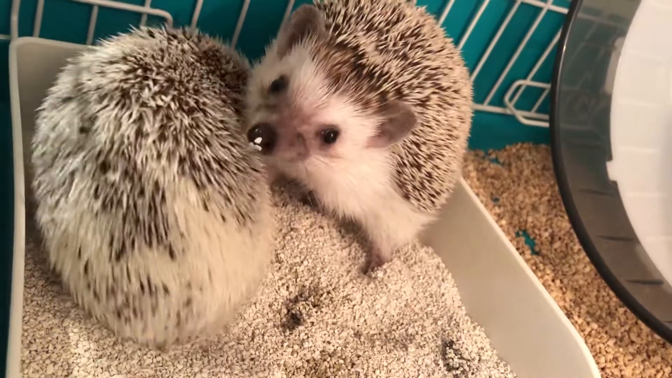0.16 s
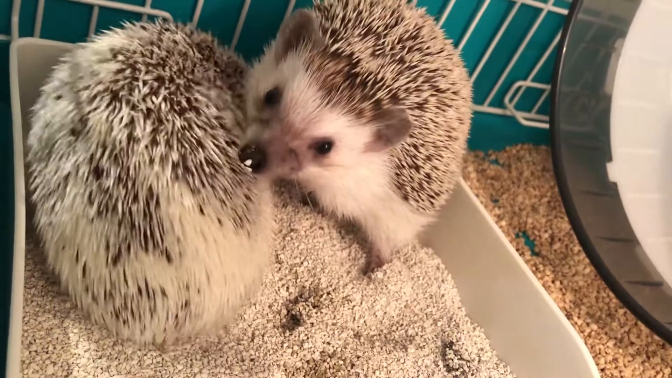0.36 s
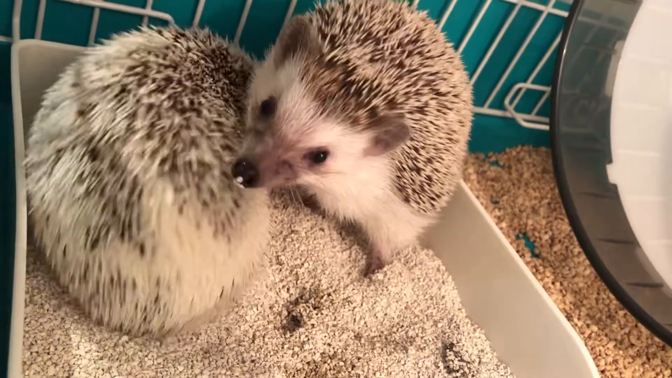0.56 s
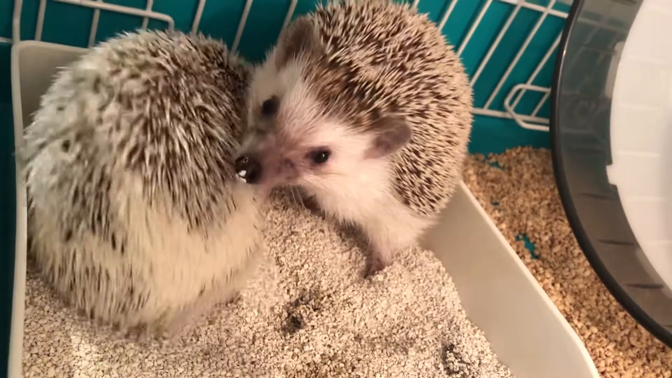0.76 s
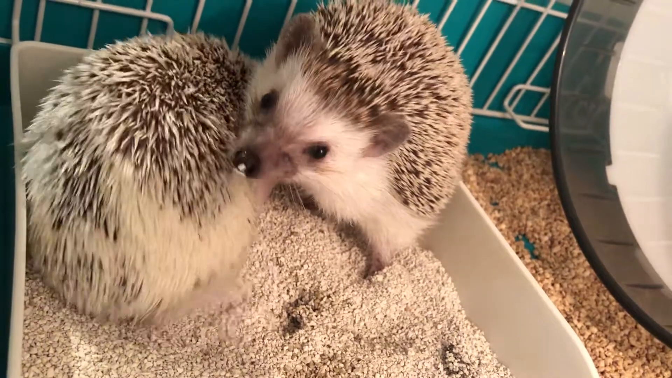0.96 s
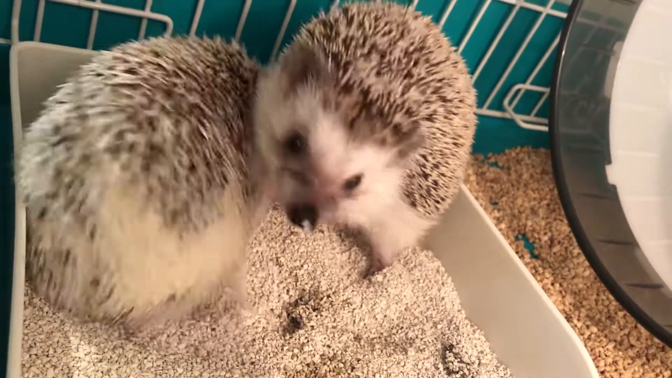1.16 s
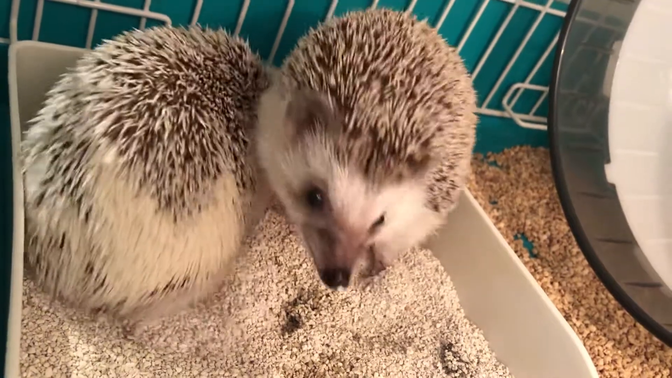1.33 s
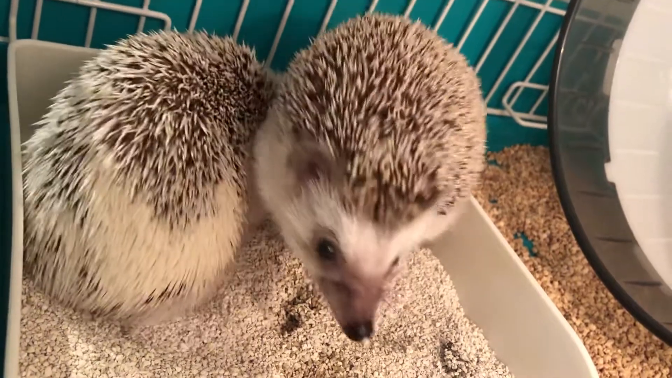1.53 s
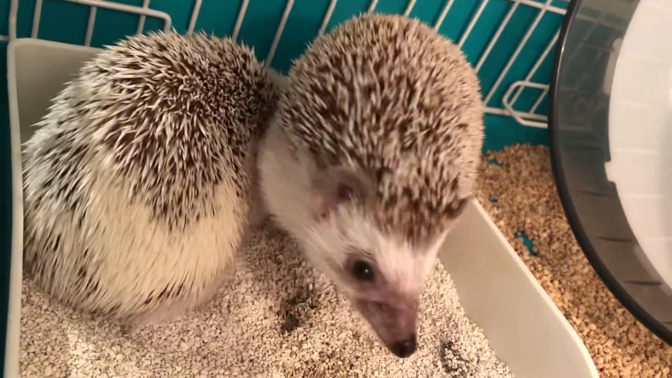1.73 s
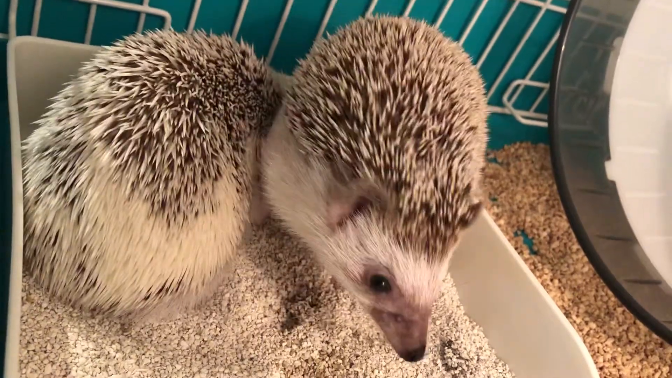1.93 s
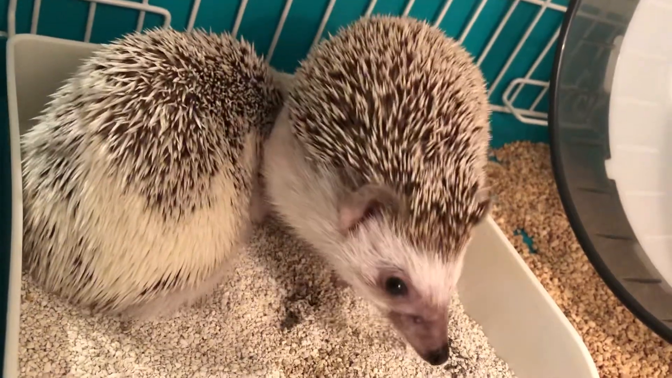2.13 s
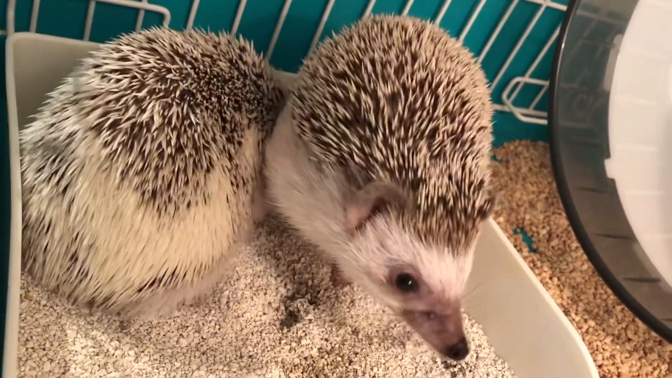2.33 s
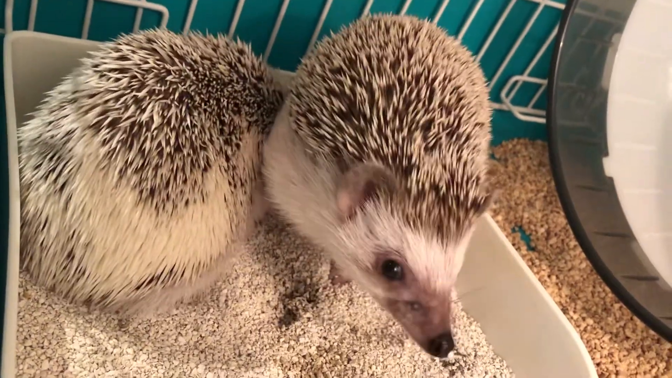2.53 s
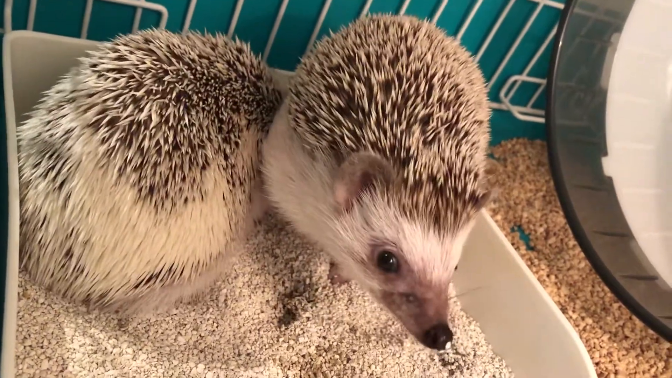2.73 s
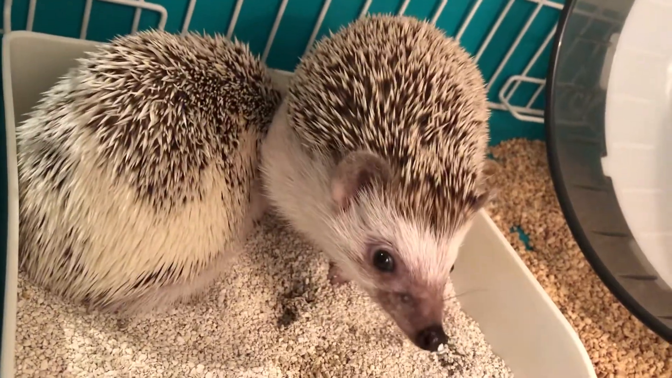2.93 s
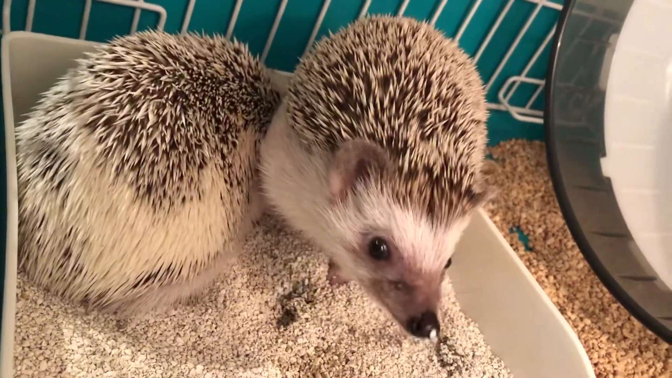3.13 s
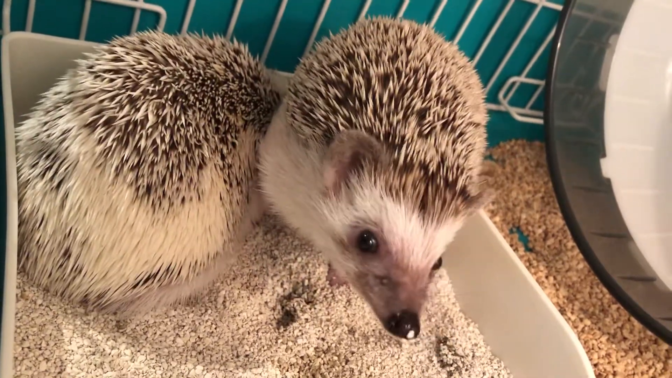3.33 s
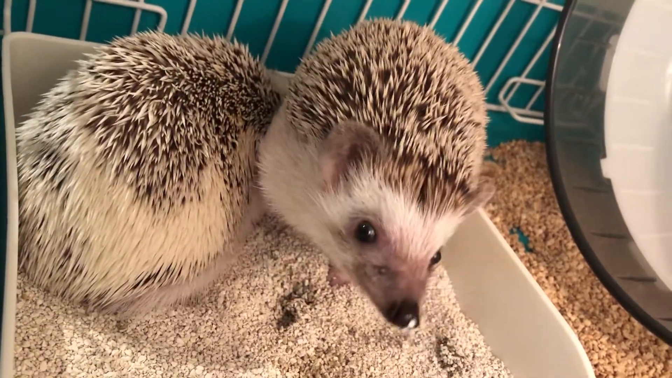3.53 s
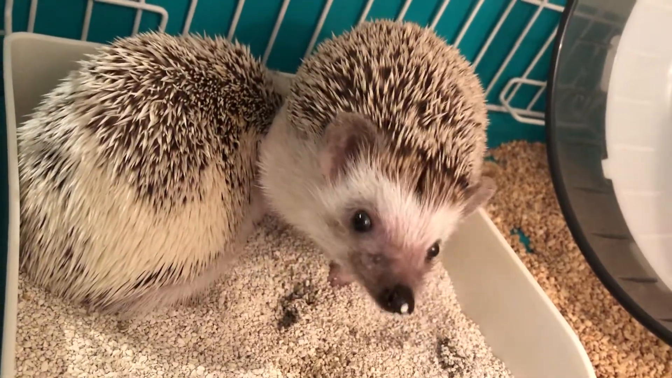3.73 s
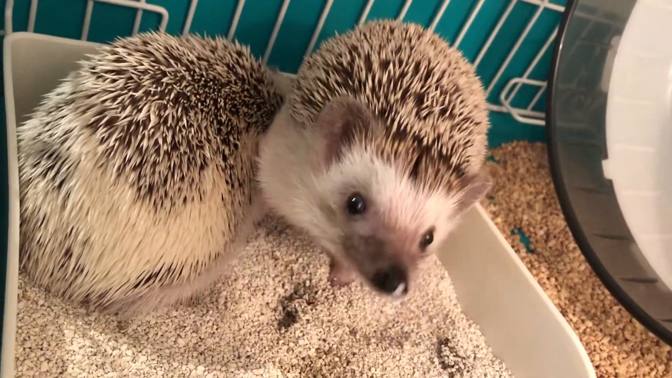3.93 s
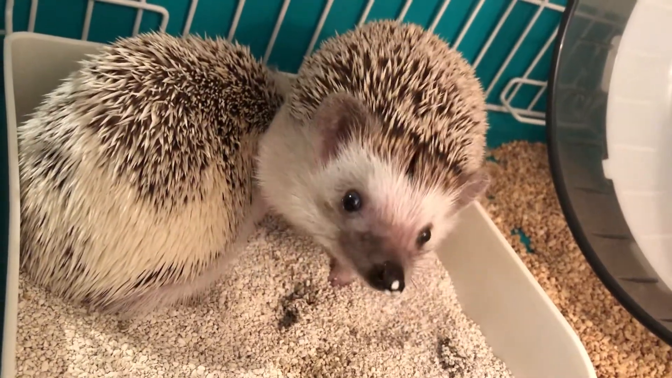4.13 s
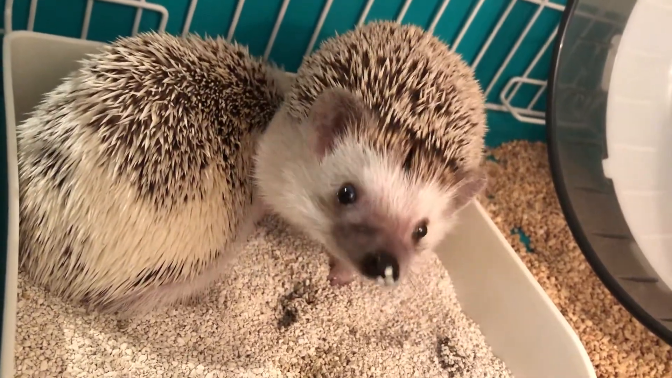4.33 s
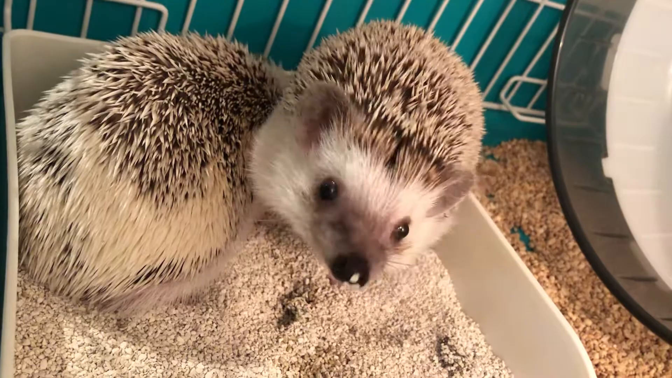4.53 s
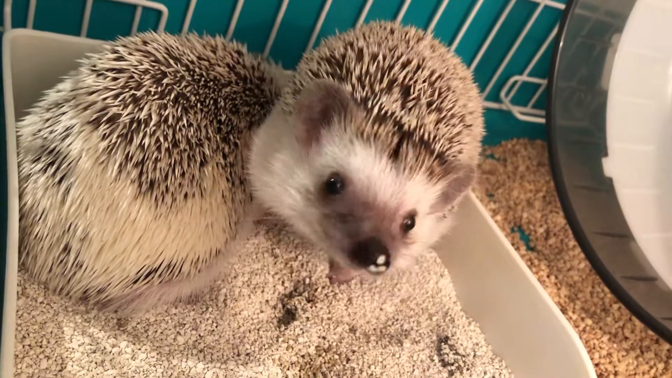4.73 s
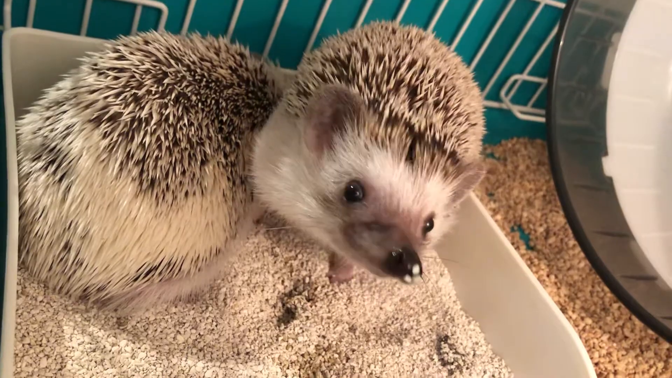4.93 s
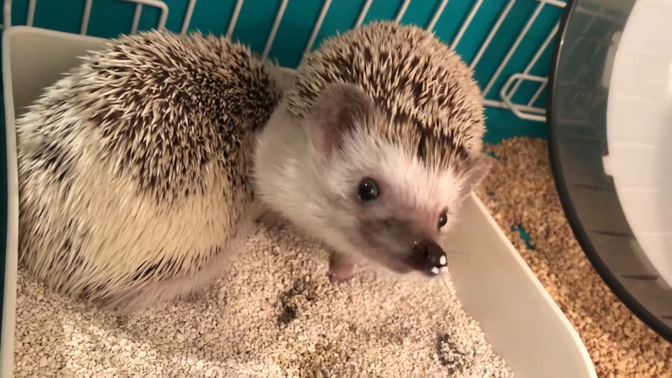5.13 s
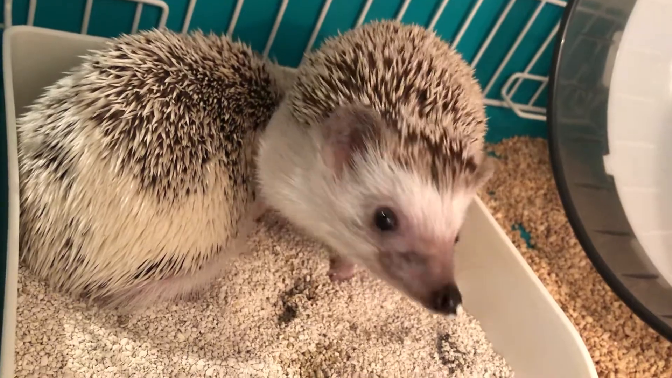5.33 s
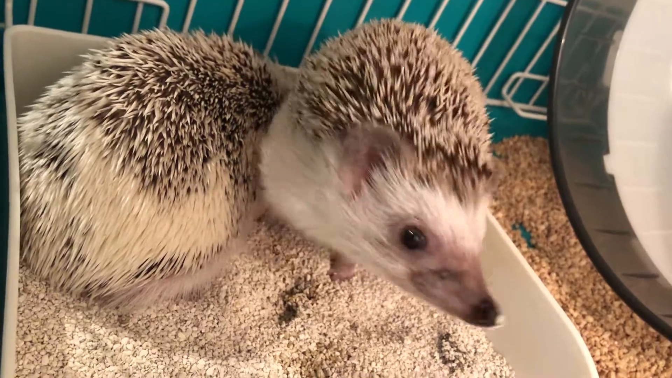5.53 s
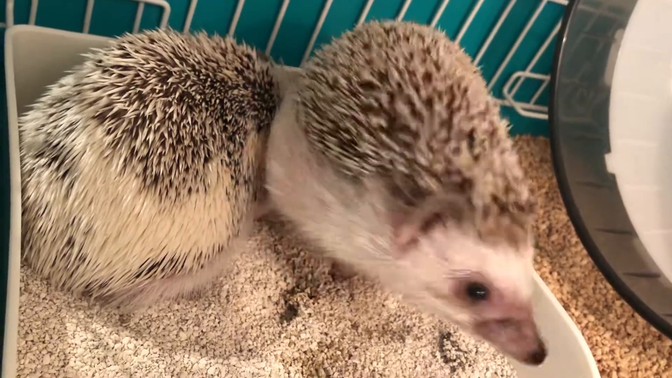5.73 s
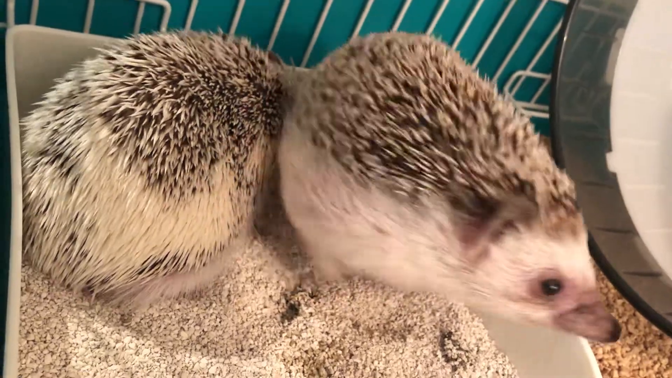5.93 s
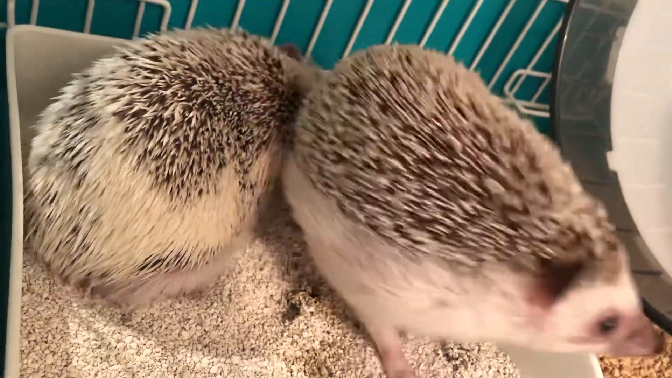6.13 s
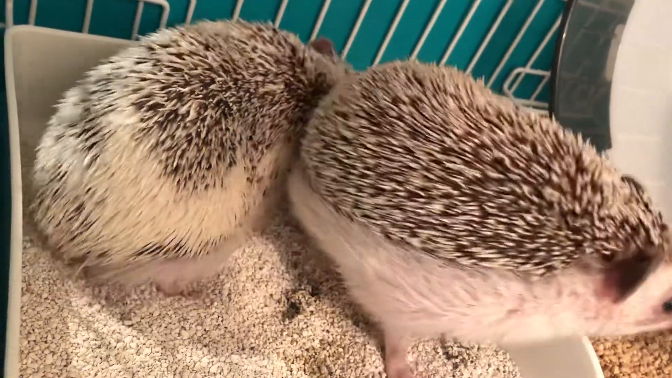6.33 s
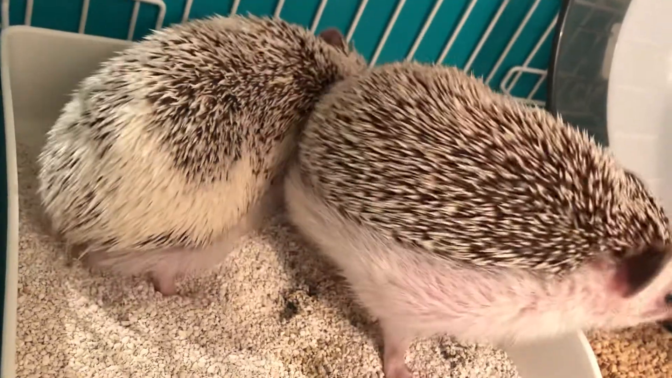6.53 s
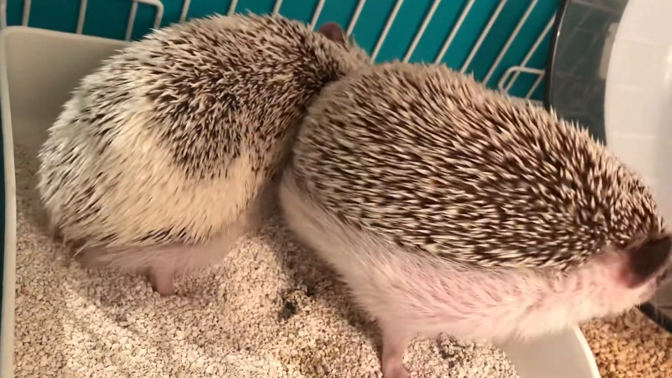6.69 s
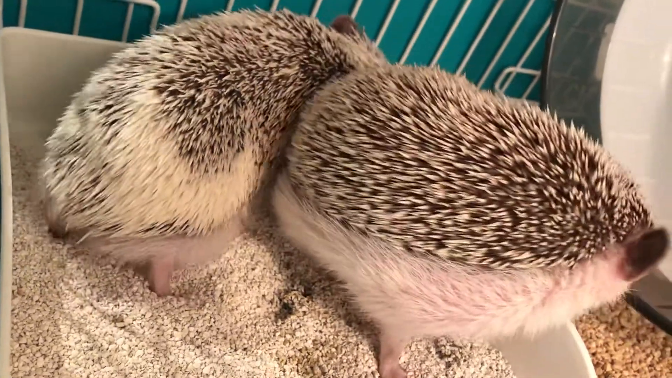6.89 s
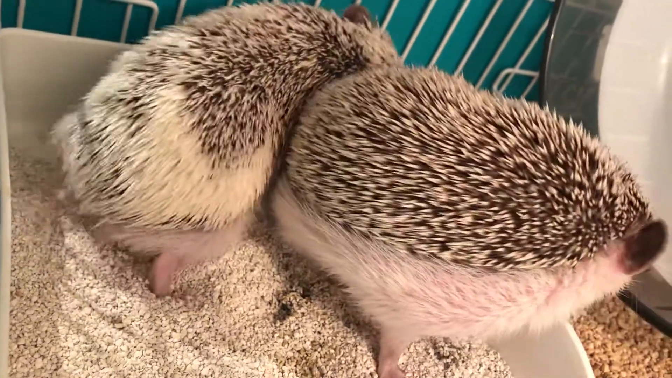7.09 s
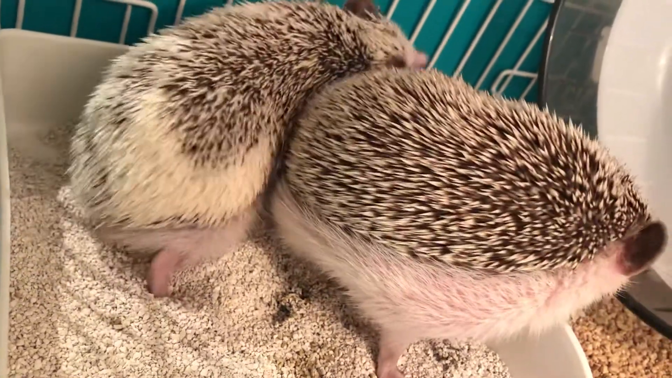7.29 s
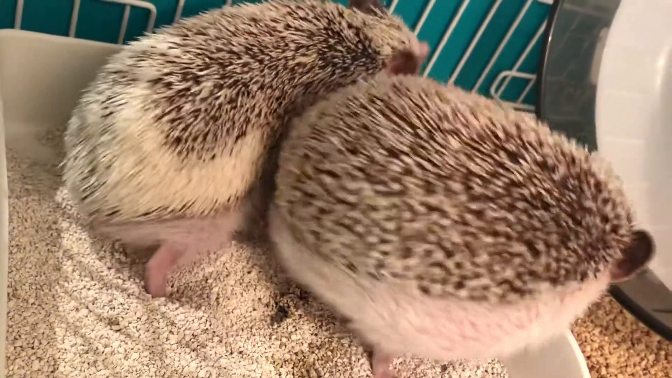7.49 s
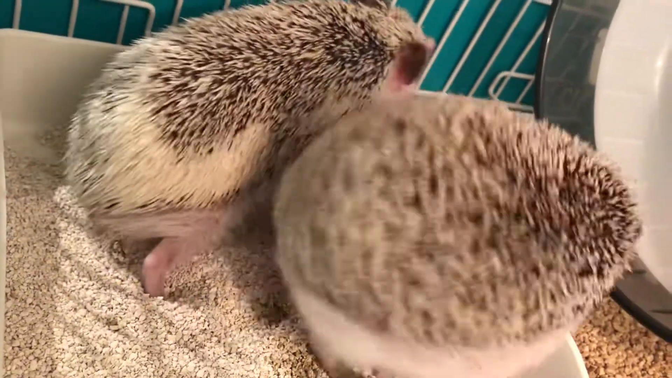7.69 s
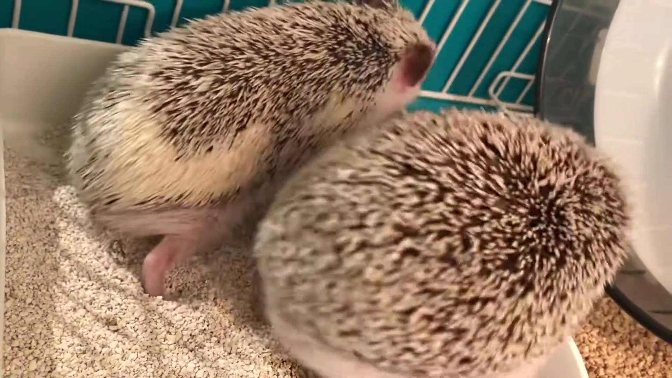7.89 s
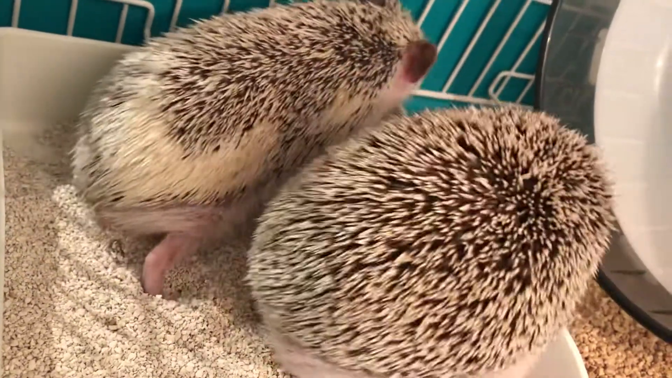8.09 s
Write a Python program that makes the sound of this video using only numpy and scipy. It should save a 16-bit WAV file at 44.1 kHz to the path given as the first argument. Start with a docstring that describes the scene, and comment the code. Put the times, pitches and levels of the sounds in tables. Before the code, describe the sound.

Close, dry pellet litter is scratched and shoved by small animals, goes nearly quiet, then hollow knocks and a renewed grainy rustle follow.

```python
"""A quiet room, close up to a plastic litter tray: two hedgehogs shift and dig in loose pellets.
Paw strokes, short scuffs, shoves and a restless stirring are random pellet contacts mixed with sliding noise.
Claws and quills scrape as gliding resonant noise and tick as short cracks with a pair of modes.
The tray rumbles and booms in low filtered noise under their weight.
Further off something hollow knocks with ringing modes and noise tails, over steady room tone."""
import sys
import numpy as np
from scipy import signal
from scipy.fft import rfft, irfft, next_fast_len
from scipy.io import wavfile

SR = 44100
rng = np.random.default_rng(int(sys.argv[2]) if len(sys.argv) > 2 else 0)


def wav_record(signal):
    """Record a signal, one row per channel, as 16-bit PCM in the file named by sys.argv[1]."""
    frames = np.transpose(np.atleast_2d(signal))
    bounded = np.clip(frames, -1, 1)
    # unit amplitude maps onto the largest positive 16-bit level
    quanta = np.round(bounded * 32767).astype(np.int16)
    wavfile.write(sys.argv[1], SR, quanta)


N = 359415  # samples
TOP_HZ = 15850  # upper limit of the sound
BODY_TOP_HZ, HISS_BOTTOM_HZ = 1500, 5500  # pellet sound splits into body, crunch and hiss here


def undb(db):
    """Decibels to amplitude gain."""
    return 10 ** (np.asarray(db) / 20)


def unit(x):
    """Scale to rms 1."""
    return x / np.sqrt(np.mean(x ** 2))


def fade(t, t60):
    """Exponential decay, 60 dB down after t60 seconds."""
    return np.exp(-np.log(1000) * t / t60)


def add(out, start, x):
    """Mix x into out from time start in seconds."""
    i = max(int(start * SR), 0)
    out[i:i + len(x)] += x[:max(N - i, 0)]


def band(x, lo_hz, hi_hz, order=2):
    """Causal Butterworth band-pass."""
    edges = [lo_hz, min(hi_hz, SR / 2 - 1000)]
    sos = signal.butter(order, edges, "band", fs=SR, output="sos")
    return signal.sosfilt(sos, x + 1e-18)


def colour(x, points, peaks=()):
    """Minimum-phase filter from (Hz, dB) points plus resonances; falls away below the first point."""
    size = next_fast_len(len(x) + 4096, True)
    size += size % 2
    f = np.maximum(np.arange(size // 2 + 1) * SR / size, 1)
    hz, db = np.transpose(points)
    curve = np.interp(np.log(f), np.log(hz), db)
    curve = curve + 20 * np.log10(np.minimum(f / hz[0], 1) ** 2)
    for centre, width, lift in peaks:
        curve = curve + lift / (1 + (2 * (f - centre) / width) ** 2)
    # folding the cepstrum onto positive times gives minimum phase
    cepstrum = irfft(np.log(undb(curve)))
    cepstrum[1:size // 2] *= 2
    cepstrum[size // 2 + 1:] = 0
    return irfft(rfft(x, size) * np.exp(rfft(cepstrum)))[:len(x)]


def together(levels_db):
    """Gain of unrelated movements at once: their powers add."""
    return np.sqrt(sum(undb(db) ** 2 for db in levels_db))


def swell(peak, rise, fall, edge_db=-9, roundness=1.7, floor_db=-110):
    """Level in dB of one movement: edge_db one rise before and one fall after its 0 dB peak."""
    t = np.arange(N) / SR - peak
    distance = np.maximum(-t / rise, t / fall)
    return np.maximum(edge_db * distance ** roundness, floor_db)  # roundness 1 pointed, 2 round


def catch(rate, depth_db):
    """Gain of a sliding contact that catches and lets go: random levels, rate of them a second."""
    steps = np.clip(rng.standard_normal(N // 50), -2, 2)
    grip = np.interp(np.arange(N) / SR * rate, np.arange(len(steps)), steps)
    return unit(undb(depth_db * grip))


def room(x, t60=0.11, wet_db=-15):
    """The small room answers the close sounds with a faint, band-limited noise tail."""
    t = np.arange(SR // 2) / SR
    noise = band(rng.standard_normal(len(t)), 150, 9400, order=1)
    tail = noise * fade(t, t60) * (t > .003)
    return x + undb(wet_db) * signal.fftconvolve(x, tail / np.linalg.norm(tail))[:N]


def walls(x, count=8, echo_db=-13, farthest=.007):
    """Early echoes off the tray walls, with random lags in seconds and signs on every call."""
    response = np.zeros(SR // 64)
    response[0] = 1
    lags = rng.uniform(.0003, min(farthest, .015), count)
    for lag, sign in zip(lags, rng.choice([-1, 1], count)):
        response[int(lag * SR)] += sign * undb(echo_db)
    return signal.fftconvolve(x, response / np.linalg.norm(response))[:len(x)]


# spectrum of the room tone: f/Hz, relative level/dB
AIR_COLOUR = [(15, -56), (25, -18), (86, 2.5), (241, 2), (276, 0), (333, -3), (812, -14), (2590, -29.5),
              (2970, -32), (4690, -36.5), (5520, -28.5), (15800, -31)]


def air(level_db=-65.5):
    """Steady room tone and microphone hiss: shaped noise at a constant level."""
    resonances = [(294, 20, -2.0), (100, 38, -2.5), (8600, 580, 6)]  # f/Hz, width/Hz, lift/dB
    tone = colour(rng.standard_normal(N), AIR_COLOUR, resonances)
    return unit(tone) * undb(level_db)


# dull blows in the room: t/s, thud and ring drive/dB, clatter and crack drive/dB, contact rise/s
KNOCKS = [(1.583, -53, -52, 0.00097), (3.177, -63, -60.5, 0.0053), (3.24, -48, -59, .005),
          (3.355, -44.5, -68, 0.018), (5.105, -24.5, -31, 0.0059), (5.232, -53, -51, 0.0073),
          (5.28, -36.5, -63, 0.0044), (5.354, -39.5, -57, 0.0022), (5.382, -36, -47, 0.0078),
          (5.947, -48, -46, 0.005), (6.018, -38, -44, 0.0074), (6.32, -34.5, -51, 0.0058)]
# ringing modes of the hollow thing: f/Hz, relative level before softening/dB, decay t60/s
KNOCK_MODES = [(179.5, -19, 0.6), (240.4, 0, 0.21), (274.4, 2, 0.32), (377, -6, 0.14), (475, -3, 0.11),
               (582, -1.5, 0.32), (955, -6.5, 0.25), (1112, -11, 0.13), (1514, 0.5, 0.14)]
# spectrum of the low noise tail: f/Hz, relative level/dB
THUD_COLOUR = [(60, -26), (120, -9), (230, 2.5), (320, -14.5), (560, -16), (900, -22.5), (2000, -74)]
# spectrum of the bright noise tail: f/Hz, relative level/dB
CLATTER_COLOUR = [(300, 4), (650, -8.5), (1000, -8.5), (1550, -4), (2300, -9.5), (4000, -16.5),
                  (8000, -23.5), (16000, -37)]
# spectrum of the shortest noise burst: f/Hz, relative level/dB
CRACK_COLOUR = [(600, 6), (1400, 13), (3000, -11), (8000, -11), (16000, -14)]


def knocks(modes_db=-1.5, crack_db=-4, soft_above_hz=300, softness=0.56, hard_db=-24):
    """Blows on a hollow thing: a crack and modes in a diffuse tail; soft blows spare the high modes."""
    out, t = np.zeros(N), np.arange(SR * 3 // 4) / SR

    def burst(points, t60):
        return unit(colour(rng.standard_normal(len(t)), points)) * fade(t, t60)

    for start, thud_db, clatter_db, contact in KNOCKS:
        tilt_db = softness * min(thud_db - hard_db, 0)  # per octave above soft_above_hz
        ring = 0
        for hz, db, t60 in KNOCK_MODES:
            gain = undb(db + tilt_db * max(np.log2(hz / soft_above_hz), 0))
            ring = ring + gain * np.sin(2 * np.pi * (hz * t + rng.random())) * fade(t, t60)
        thud = burst(THUD_COLOUR, t60=0.5)
        clatter = burst(CLATTER_COLOUR, t60=0.3)
        crack = burst(CRACK_COLOUR, t60=0.15)
        blow = undb(thud_db) * (thud + undb(modes_db) * ring) / 2
        blow = blow + undb(clatter_db) * (clatter + undb(crack_db) * crack)
        add(out, start, blow * np.minimum(t / contact, 1))
    return out


# how restless the animals are: t/s, crunch level/dB, body relative level/dB, hiss relative level/dB
STIR = [(0, -58.5, -1.5, -6.5), (0.45, -58.5, -2, -5), (1.5, -60, -2, -19), (1.82, -71, 1, -8),
        (2.6, -73.5, 2.5, -10), (2.76, -67.5, 1.5, -5.5), (3.15, -75, 7, -9), (3.9, -72, 2, -9.5),
        (4.45, -73.5, 0.5, -7.5), (5.1, -73.5, 4, -9), (5.52, -63, -6, -14.5), (6.3, -49.5, -6, -9),
        (6.801, -58.5, -5, -9), (7.15, -60, -1, -9.5), (7.6, -57, -3, -11), (8.05, -63.5, 3, -10.5),
        (8.15, -59, 1, -9)]


def stirring():
    """Slowly rising and falling stir of pellets: level, body and hiss in dB for every sample."""
    s, *columns = np.transpose(STIR)
    return [np.interp(np.arange(N) / SR, s, db) for db in columns]


# an animal leans or steps: peak t/s, rise/s, fall/s, level ahead of the last band-pass/dB
LEANS = [(0.33, 0.028, 0.055, -52.5), (0.63, .04, 0.14, -52.5), (0.79, 0.066, .05, -60),
         (1.01, .05, 0.044, -50.5), (1.4, .05, 0.089, -54.5), (1.6, 0.025, 0.044, -51.5),
         (1.25, .08, .1, -60), (2.73, 0.052, 0.15, -63), (3.33, 0.35, 0.18, -59), (4.11, 0.094, .13, -56.5),
         (5.6, 0.053, 0.092, -53.5), (5.86, 0.11, 0.092, -48), (6.1, 0.19, 0.16, -44.5),
         (6.37, 0.043, 0.17, -45.5), (6.64, 0.059, 0.055, -52.5)]
# spectrum of the juddering tray: f/Hz, relative level/dB
RUMBLE_COLOUR = [(18, -43), (30, -23), (49, -5), (68, -3), (81, 1), (118, 5), (276, -0.5), (321, -9.5),
                 (360, 1.5), (408, -14), (463, -1.5), (526, -5.5), (567, -3), (620, -7.5), (810, -36),
                 (1360, -120)]


def rumble(stir_db=-4):
    """The tray floor judders as low noise: faintly with all stirring, more when weight shifts on it."""
    levels = [stirring()[0] + stir_db]
    levels += [db + swell(peak, rise, fall) for peak, rise, fall, db in LEANS]
    resonances = [(81, 7, -3.5), (121, 23, -4.5), (212, 130, 1.5), (433, 22, 6.0)]  # f/Hz, width/Hz, lift/dB
    shaking = rng.standard_normal(N) * catch(rate=61, depth_db=2.0)
    judder = unit(colour(shaking, RUMBLE_COLOUR, resonances))
    return band(judder, 28, 740, order=3) * together(levels)


def friction(table, half_width):
    """Rubbing noise carried on a gliding tone; half_width is a share of the mean pitch."""
    out = np.zeros(N)
    for start, end, first_hz, last_hz, db in table:
        n = max(int((end - start) * SR), 64)
        hz = np.geomspace(first_hz, last_hz, n)
        noise = rng.standard_normal((2, SR // 2))
        sos = signal.butter(2, half_width * hz.mean(), fs=SR, output="sos")
        rub = signal.sosfilt(sos, noise[0] + 1j * noise[1])[-n:]  # the end, once the filter has settled
        glide = np.exp(2j * np.pi * np.cumsum(hz) / SR)
        sound = np.real(rub * glide) * signal.windows.tukey(n, .5)
        add(out, start, undb(db) * unit(sound))
    return out


# the tray flexes: start t/s, end t/s, first f/Hz, last f/Hz, rms level/dB
BOOMS = [(.305, .345, 553, 527, -43), (.32, .36, 217, 173, -50), (1.375, 1.44, 126, 117, -53.5),
         (3.235, 3.29, 843, 736, -54.5), (3.25, 3.48, 590, 559, -63), (3.33, 3.5, 172, 168, -55),
         (4.08, 4.22, 190.5, 161.5, -59.5), (4.085, 4.19, 680, 630, -59), (5.82, 5.97, 86, 79, -48),
         (5.94, 5.975, 485, 473, -43), (6.0, 6.06, 488, 428, -41), (6.04, 6.2, 268.6, 216, -47.5),
         (6.18, 6.33, 89, 75.5, -52), (6.316, 6.35, 470, 433, -43)]


def booms():
    """The flexing tray booms as narrow noise gliding in pitch."""
    return friction(BOOMS, half_width=0.053)


# spectrum of the grinding pellets: f/Hz, relative level/dB
LITTER_COLOUR = [(240, -44.5), (400, -12.5), (553, -1.5), (644, 0), (1100, -6), (1600, 0), (2420, 3),
                 (2780, -3), (3000, -5.5), (3290, -1.5), (4210, -6.5), (11400, -18), (14000, -21),
                 (15800, -22)]
# resonances of tray and pellets: f/Hz, width/Hz, lift/dB
TRAY_RESONANCES = [(600, 92, 2.5), (910, 320, 8), (1131, 200, 8), (1520, 61, 3.5), (2100, 120, 0),
                   (2350, 98, -1), (3012, 200, 8), (4290, 520, 5)]


def pellets(rate, spread_db, sliding_db):
    """Random contacts, each of its own size and colour, over sliding hiss; three zones of rms 1."""
    edges = np.geomspace(380, 17000, 19)  # Hz
    at = np.flatnonzero(rng.random(N) < rate / SR)  # rate in contacts per second
    chance = rng.standard_normal((N // 8, len(edges)))[:len(at)]
    size = undb(spread_db * np.minimum(np.abs(chance[:, -1]), 2.5))
    grit = 0
    for k in range(len(edges) - 1):  # a random strength in every band colours each contact
        contacts = np.zeros(N)
        contacts[at[:len(size)]] = size * chance[:, k]
        grit = grit + band(contacts, edges[k], edges[k + 1])
    sliding = undb(sliding_db)
    mixed = (unit(grit) + sliding * rng.standard_normal(N)) / np.hypot(1, sliding)
    grit = colour(mixed, LITTER_COLOUR, TRAY_RESONANCES)
    zones = [(430, BODY_TOP_HZ), (BODY_TOP_HZ, HISS_BOTTOM_HZ), (HISS_BOTTOM_HZ, TOP_HZ)]
    return [unit(band(grit, lo, hi, order=3)) for lo, hi in zones]


# smooth sliding against single pellet contacts: t/s, relative level/dB
SLIDING = [(0, 7.5), (2.5, -2.5), (2.8, 8), (4.2, 8.5), (4.5, -0.5), (5.7, 5), (5.95, 6), (6.5, 9),
           (6.75, 1), (8.15, -4.5)]
# a body shoves through the litter: peak t/s, rise/s, fall/s, crunch level/dB,
# body relative level/dB, hiss relative level/dB
SHOVES = [(0.265, 0.032, 0.08, -41, -2, -8.5), (0.48, 0.05, 0.063, -51, -4, -6),
          (0.77, .06, .06, -48, -3.5, -12), (0.93, .04, 0.14, -45, -1, -5),
          (1.22, 0.075, 0.15, -47.5, -5.5, -7), (1.45, 0.067, 0.057, -53, -10, -1.5),
          (1.7, 0.06, 0.066, -55, -4.5, -13), (2.34, 0.066, .07, -66.5, -5, -8),
          (2.95, 0.031, 0.028, -66, 3, -11), (3.08, 0.042, 0.048, -60.5, -3, -4.5),
          (3.32, 0.14, 0.23, -67.5, 9.5, -19), (4.15, 0.11, 0.067, -58.5, 3.5, -10),
          (5.59, 0.047, 0.074, -59.5, 2.5, -9), (5.85, 0.12, 0.13, -52.5, -11, -8),
          (6.05, 0.11, 0.093, -45.5, 1, -6), (6.22, 0.16, 0.078, -48, -6, -8.5),
          (6.38, .08, 0.071, -47.5, -6, -5), (6.6, 0.034, 0.051, -51, -9, -7),
          (7.255, 0.046, 0.028, -51.5, -11, -5.5), (7.37, .05, 0.068, -47, -6.5, -7.5),
          (7.53, 0.049, 0.096, -50.5, -9, -5.5), (7.7, 0.041, .05, -55, 0, -5),
          (7.93, .07, 0.048, -51, -5, -12), (8.13, 0.031, 0.065, -55.5, 6.5, -7)]


def shuffle():
    """Bellies and feet stir and shove loose pellets: jerky when they step, smooth when they slide."""
    sliding_db = np.interp(np.arange(N) / SR, *np.transpose(SLIDING))
    body, crunch, hiss = pellets(rate=1100, spread_db=6.0, sliding_db=sliding_db)
    moves = [stirring()]
    for peak, rise, fall, db, body_db, hiss_db in SHOVES:
        moves.append((db + swell(peak, rise, fall), body_db, hiss_db))
    sound = body * together(db + body_db for db, body_db, _ in moves)
    sound += crunch * together(db for db, _, _ in moves)
    sound += hiss * together(db + hiss_db for db, _, hiss_db in moves)
    jerk_db = 5.0 / np.hypot(1, undb(sliding_db))  # sliding evens out the jerks
    return sound * catch(rate=90, depth_db=jerk_db)


def tick(hz, crack_db, cycles=45, crack_t60=0.01, upper=1.092, upper_db=-7, rise=0.00064):
    """A hard tip snaps free: a short crack and a close pair of modes; low ones ring longer. Peak 1."""
    t = np.arange(SR // 16) / SR
    t60 = cycles / hz
    ring = np.sin(2 * np.pi * hz * t) * fade(t, t60)
    upper_hz = min(upper * hz, TOP_HZ)
    ring += undb(upper_db) * np.sin(2 * np.pi * upper_hz * t) * fade(t, t60 / upper)
    crack = unit(band(rng.standard_normal(len(t)), 0.33 * hz, 1.79 * hz)) * fade(t, crack_t60)
    sound = (ring / 2 + undb(crack_db) * crack) * np.minimum(t / rise, 1)
    return sound / np.abs(sound).max()


# pellets flicked loose: start t/s, end t/s, landings per s, typical peak level/dB
SPILLS = [(0.2, 0.35, 70, -32), (0.56, 0.732, 60, -35), (0.919, 1.05, 80, -30.5), (1.19, 1.46, 45, -36.5),
          (2.27, 2.479, 35, -53.5), (2.898, 3.12, 25, -54), (4.45, 4.902, 14, -53), (5.75, 6.6, 30, -40),
          (6.598, 7.203, 25, -47.5), (7.251, 8.0, 40, -44.5)]


def spills(centre_hz=2900, spread_octaves=.55, spread_db=2.0, count=64):
    """Loose pellets land at random moments, each a tick with its own size and pitch."""
    out = np.zeros(N)
    for start, end, rate, db in SPILLS:
        places = rng.random(count)
        chance = np.clip(rng.standard_normal((count, 2)), -2, 2)
        landings = int((end - start) * rate)
        for place, (pitch, size) in zip(places[:landings], chance):
            hz = min(centre_hz * 2 ** (spread_octaves * pitch), TOP_HZ)
            sound = tick(hz, crack_db=-1, cycles=28, crack_t60=0.0068, rise=0.00017)
            add(out, start + place * (end - start), undb(db + spread_db * size) * sound)
    return out


# claws, quills and single pellets: t/s, peak level/dB, ring f/Hz, crack drive/dB
TICKS = [(0.2325, -24, 2500, -6), (0.2372, -22, 2120, 2), (0.309, -24, 2620, -6), (0.322, -25, 2490, -9),
         (0.3286, -30, 1130, -9), (0.4007, -28.5, 3100, 2), (0.5178, -34, 2300, 0), (0.5287, -35, 3000, -3),
         (0.579, -23.5, 8500, -15), (0.627, -25, 5340, -17), (0.716, -27, 3360, -1),
         (0.7904, -27, 2230, -13), (0.8023, -26, 2800, -4), (0.897, -36, 5360, -13),
         (0.9991, -17.5, 2410, -2.5), (1.4745, -30.5, 3140, -13), (1.7545, -39, 2570, -2),
         (1.833, -47, 3060, -4), (1.953, -44, 2990, 0), (1.9854, -42, 2150, -3), (2.2215, -32, 8240, -15),
         (2.3033, -44, 2920, -7), (2.3807, -53, 2960, -8), (2.404, -52, 3010, -4), (2.425, -44.5, 3350, -6),
         (2.4927, -30.5, 3430, -16), (2.5452, -46, 12000, -19), (2.554, -46.5, 3250, -10),
         (2.5625, -53, 11800, -6), (2.581, -53, 3300, -19), (3.388, -52, 7050, 2),
         (4.7495, -39, 5470, -6.5), (5.5983, -43, 5600, -8), (5.6578, -39.5, 2270, -14),
         (5.7182, -33.5, 3000, -6), (6.2492, -32, 2360, -9), (6.411, -31, 1480, -3),
         (6.5306, -35, 2120, -2), (6.708, -36, 1420, 14), (6.7721, -35, 1300, 6), (7.21, -37, 4630, -9),
         (7.2722, -43, 2500, -5), (7.357, -30, 1900, 0), (7.3737, -31, 3280, -9), (7.3808, -31, 3130, -11),
         (7.408, -40, 5440, -7), (7.432, -38, 5500, -7), (7.541, -37, 2940, -1), (7.549, -31, 2970, -16),
         (7.6266, -38, 1680, 5), (7.652, -34.5, 788, -2), (7.7908, -43, 2350, -9),
         (7.9433, -35.5, 4140, -1), (7.9858, -44, 3380, -2), (8.0242, -35.5, 2500, 1),
         (8.0974, -31.5, 730, -6)]


def ticks():
    """The clearest single ticks, each a crack with its ringing pair of modes."""
    out = np.zeros(N)
    for start, db, hz, crack_db in TICKS:
        add(out, start, undb(db) * tick(hz, crack_db))
    return out


# claws and quills dragging: start t/s, end t/s, first f/Hz, last f/Hz, rms level/dB
SCRAPES = [(0.199, 0.239, 9800, 6170, -43), (0.227, 0.244, 3290, 1630, -41), (0.254, 0.339, 1072, 514, -46),
           (.572, .637, 9070, 5380, -49.5), (0.616, 0.651, 1240, 802, -42.5),
           (.655, .684, 2380, 2220, -42.5), (.783, .81, 2506, 2287, -42.5), (.94, .99, 11000, 5480, -49),
           (.997, 1.028, 2518, 1010, -40), (1.235, 1.3, 4250, 3600, -46.5),
           (1.276, 1.334, 16000, 11500, -47.5), (1.312, 1.356, 9400, 5070, -53),
           (1.58, 1.635, 1550, 1404, -56.5), (1.66, 1.79, 2714, 2430, -57), (1.997, 2.042, 2750, 2537, -51),
           (2.2, 2.26, 3100, 2946, -49.5), (3.173, 3.205, 1650, 1415, -58), (3.24, 3.43, 1983, 1690, -66),
           (7.49, 7.59, 2575, 2500, -51.5), (7.535, 7.568, 3026, 2690, -44), (7.683, 7.725, 1080, 850, -55),
           (8.09, 8.15, 790, 1207, -58)]


def scrapes():
    """Claws and quills scrape as resonant noise, the pitch sliding as they go."""
    return friction(SCRAPES, half_width=0.14)


# paw strokes, and a short scuff within the room knock at 5.38 s: start t/s, length/s,
# crunch level before the pressure envelope/dB, body relative level/dB, hiss relative level/dB
STROKES = [(0.102, 0.033, -57, -14, -0.5), (0.163, 0.056, -43.5, -7, 1), (0.223, 0.022, -44, -11, 0),
           (0.305, .03, -40.5, 2, -1.5), (0.555, 0.06, -42, -3.5, -3), (0.613, .031, -37.5, -6.5, -11),
           (0.654, 0.019, -41.5, -6, -6), (0.703, .024, -42.5, -6, -9.5), (0.782, 0.022, -39, -6, -5),
           (0.82, 0.028, -50.5, -10, -0.5), (0.87, .015, -51, -5, 0), (0.91, 0.074, -42.5, -4.5, -4.5),
           (0.983, 0.046, -37, -3.5, -9.5), (1.029, 0.023, -41.5, -8, -7.5),
           (1.121, 0.045, -45.5, 0, -10.5), (1.197, 0.053, -40.5, -5, -2.5), (1.256, .099, -49, -3.5, -3),
           (1.378, 0.08, -47.5, -0.5, -11), (1.473, 0.0034, -38.5, -3, -18), (1.681, 0.024, -56.5, -3, -11),
           (1.723, 0.04, -55, -2, -5), (1.996, 0.041, -51, -5, -9), (2.19, 0.067, -50.5, -4, -4.5),
           (2.212, 0.017, -55, -8, 11), (3.063, .02, -62, 1, -11), (4.084, 0.03, -61, -5, 3),
           (5.379, 0.035, -55, -8, -13), (5.713, 0.027, -48, -4, -11), (5.743, 0.05, -47, 1, -4.5),
           (6.237, 0.012, -53.5, 1, 4), (6.871, 0.045, -53, -4, -12.5), (7.017, 0.042, -53.5, -15, -5),
           (7.25, 0.026, -51.5, -5, -3), (7.352, 0.033, -50.5, 0.5, -7), (7.536, 0.024, -46.5, -16, -1.5),
           (7.681, 0.018, -56, 10, -6), (7.732, 0.015, -48, -12, -8), (8.093, 0.0095, -51.5, 3, -6)]


def strokes_and_scuffs(bite_share=0.07, release=0.0028):
    """A short grating scuff or paw stroke starts, drags and lifts; long ones start more gently."""
    zones = np.array(pellets(rate=1500, spread_db=5.5, sliding_db=-2.0))
    zones = zones * catch(rate=150, depth_db=1.0)
    out = np.zeros(N)
    for start, length, level_db, body_db, hiss_db in STROKES:
        i = int(start * SR)
        t = np.arange(min(int((length + 6 * release) * SR), N - i)) / SR
        onset = 1 - np.exp(-t / (bite_share * length))
        lift = np.exp(-np.maximum(t - length, 0) / release)  # release in seconds
        grit = 0
        for zone, db in zip(zones, (body_db, 0, hiss_db)):
            grit = grit + unit(zone[i:i + len(t)]) * undb(level_db + db)
        add(out, start, walls(onset * lift * grit))
    return out


def scene():
    """Room tone under all, knocks further off, tray and litter sounds close by."""
    background = air() + knocks()
    tray = rumble() + booms()
    litter = shuffle() + scrapes() + strokes_and_scuffs()
    snaps = spills() + ticks()
    return (background + tray + room(litter) + room(snaps, wet_db=-26))[None]


def record(dry):
    """The phone cuts the top: a steep elliptic low-pass."""
    return signal.sosfilt(signal.ellip(10, .2, 75, TOP_HZ, fs=SR, output="sos"), dry)


dry = scene()
out = record(dry)
wav_record(out)
```